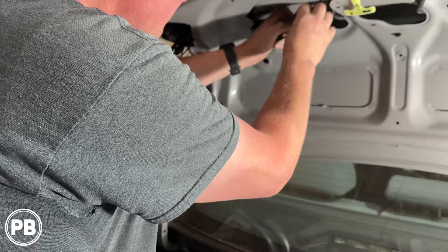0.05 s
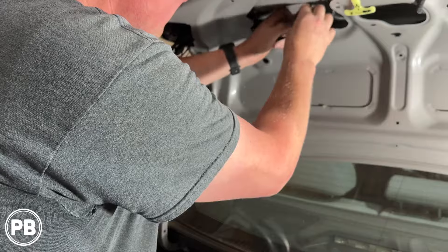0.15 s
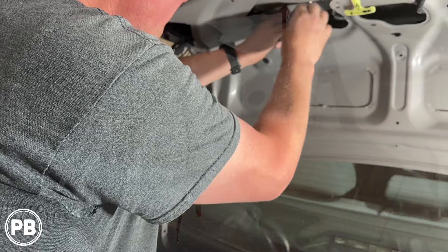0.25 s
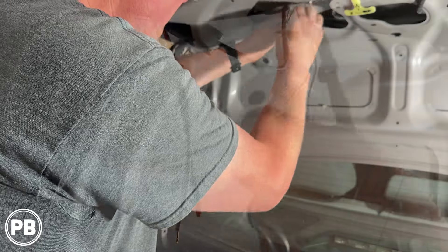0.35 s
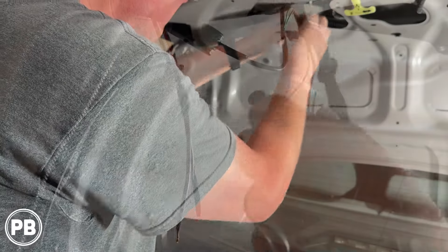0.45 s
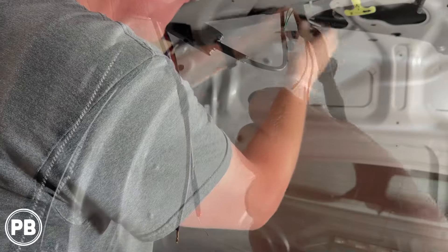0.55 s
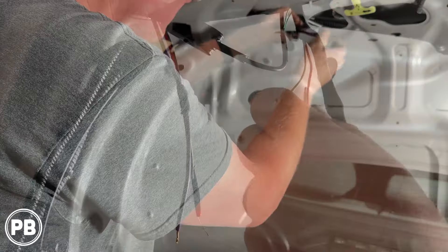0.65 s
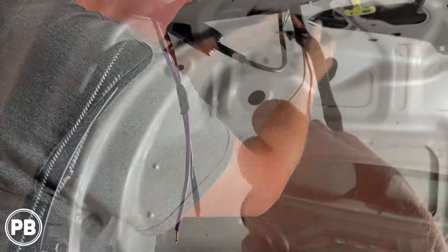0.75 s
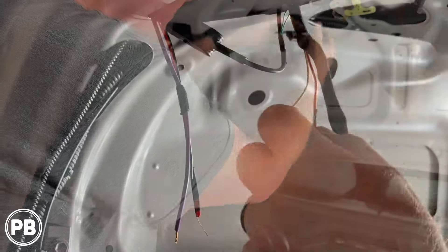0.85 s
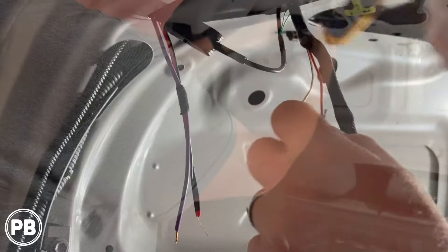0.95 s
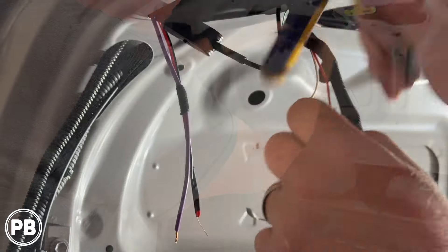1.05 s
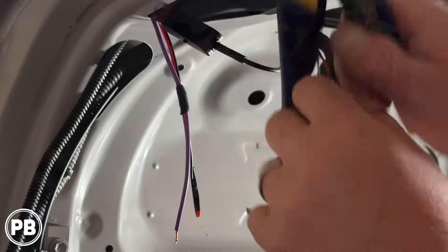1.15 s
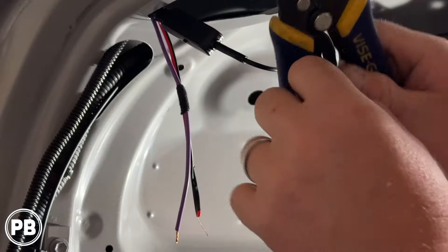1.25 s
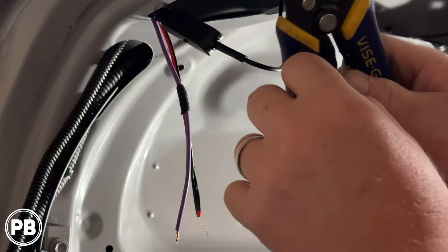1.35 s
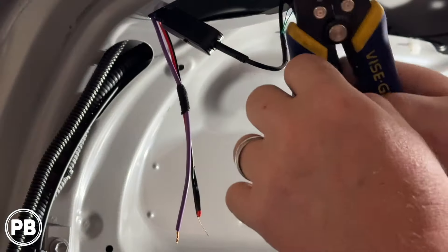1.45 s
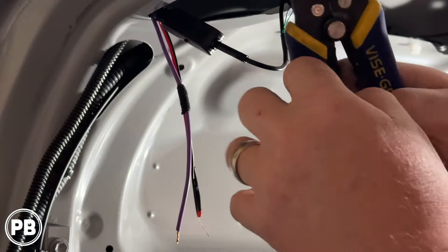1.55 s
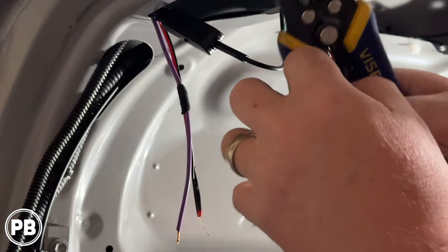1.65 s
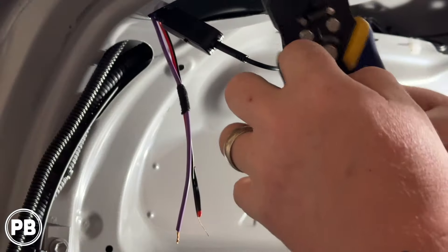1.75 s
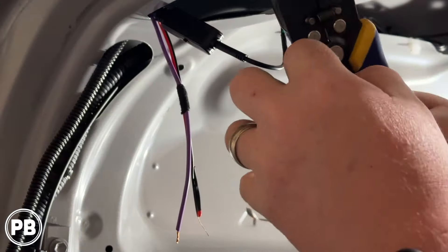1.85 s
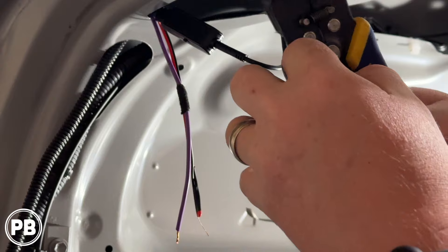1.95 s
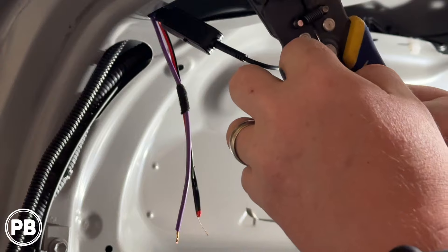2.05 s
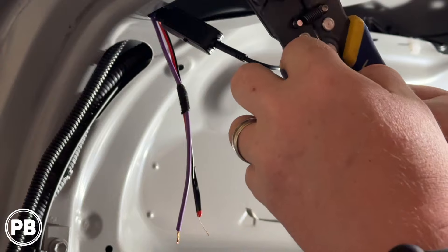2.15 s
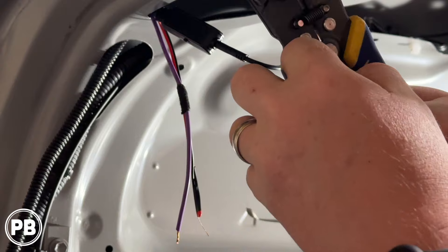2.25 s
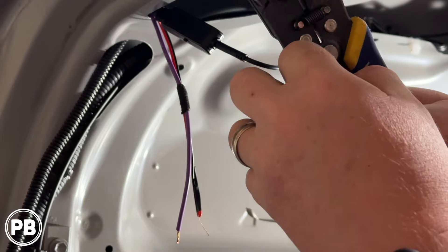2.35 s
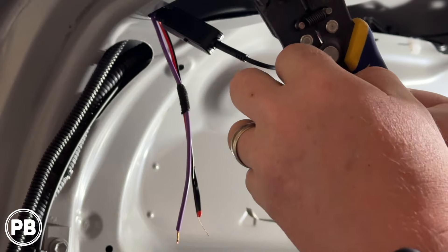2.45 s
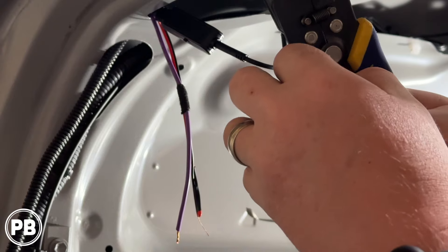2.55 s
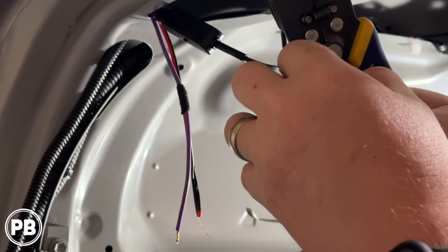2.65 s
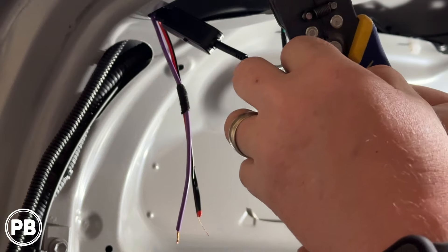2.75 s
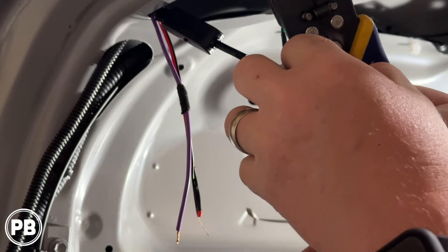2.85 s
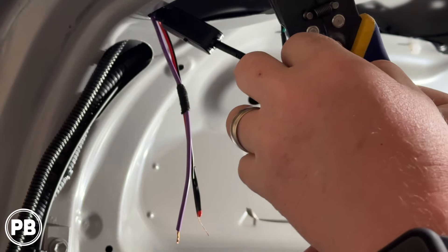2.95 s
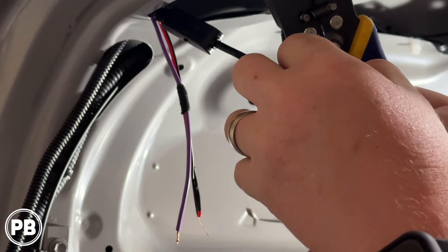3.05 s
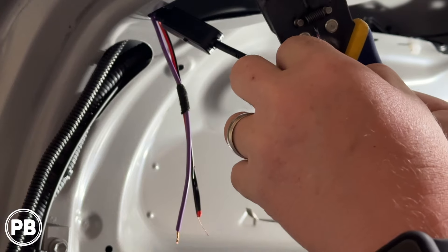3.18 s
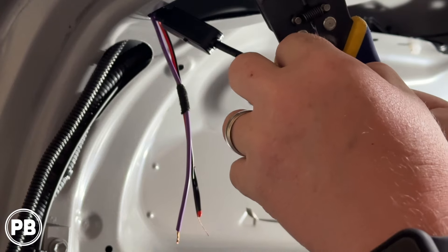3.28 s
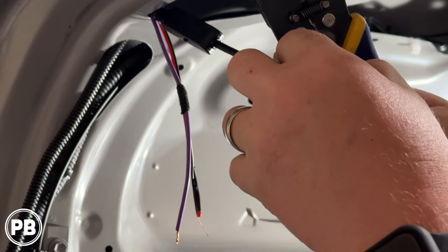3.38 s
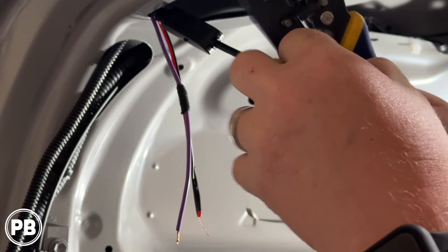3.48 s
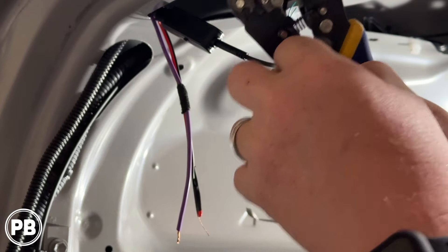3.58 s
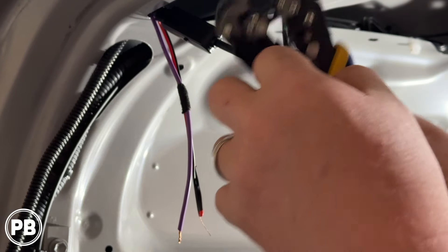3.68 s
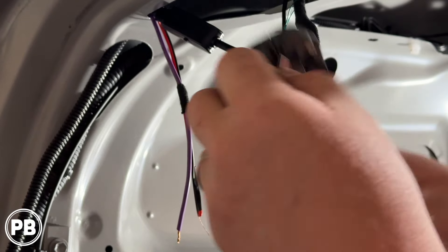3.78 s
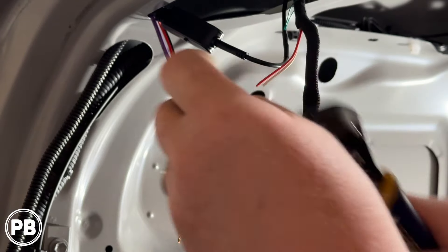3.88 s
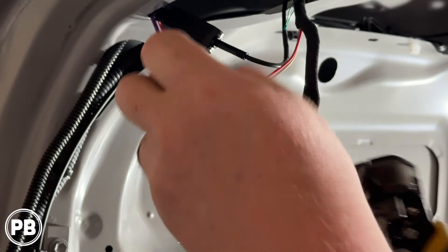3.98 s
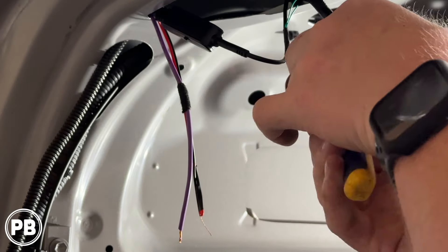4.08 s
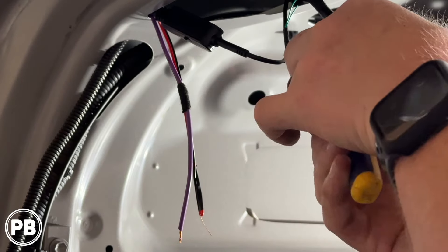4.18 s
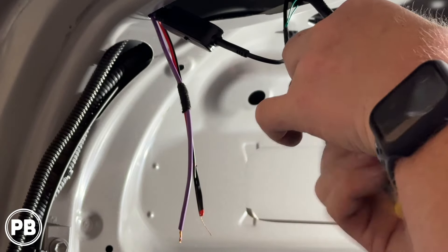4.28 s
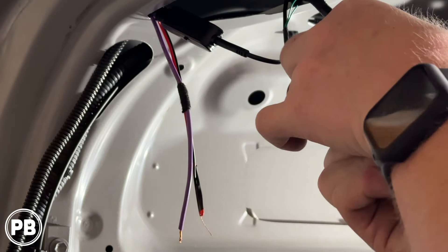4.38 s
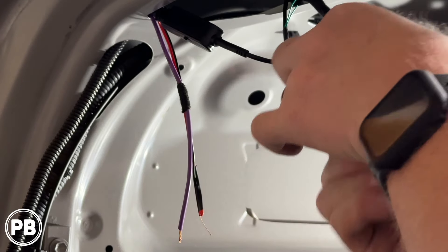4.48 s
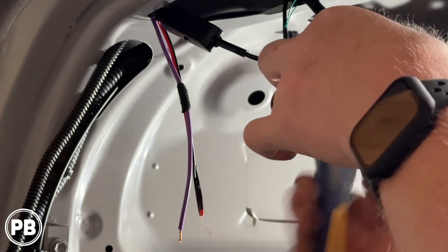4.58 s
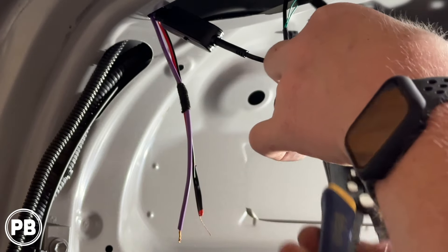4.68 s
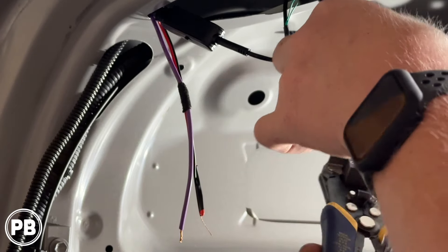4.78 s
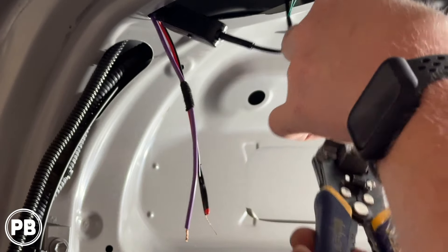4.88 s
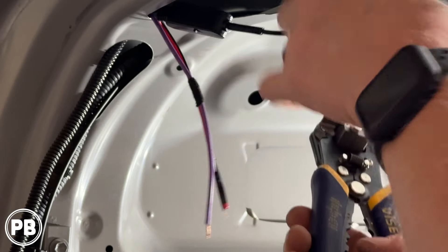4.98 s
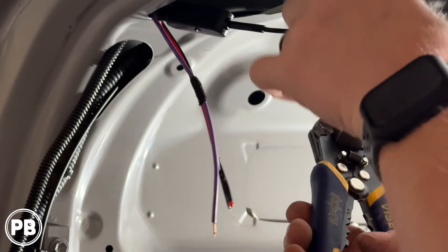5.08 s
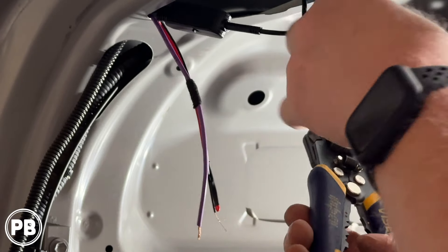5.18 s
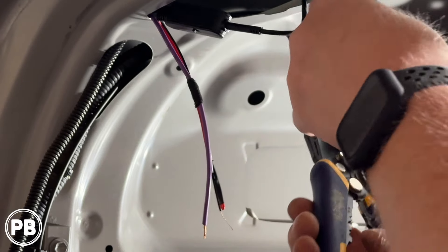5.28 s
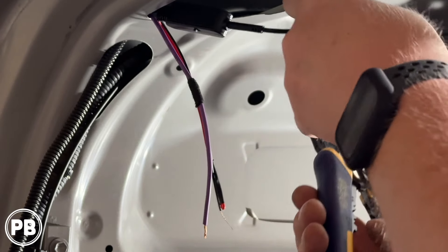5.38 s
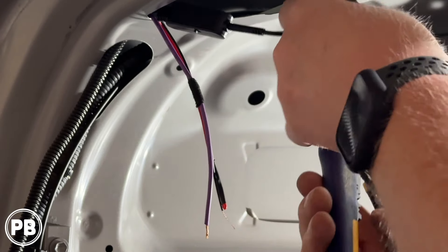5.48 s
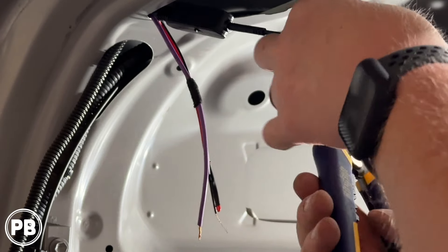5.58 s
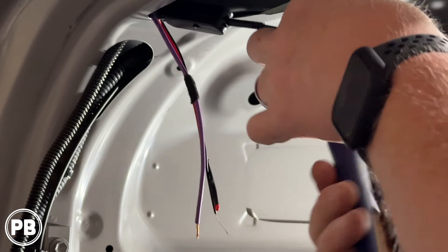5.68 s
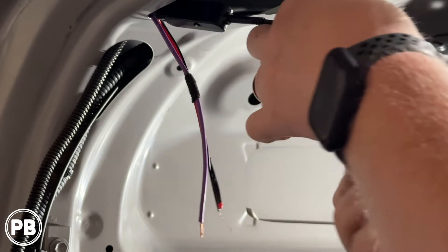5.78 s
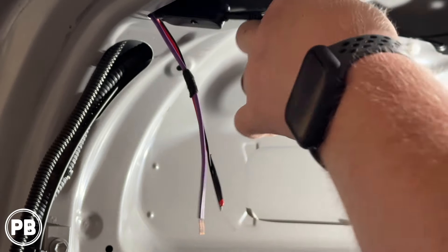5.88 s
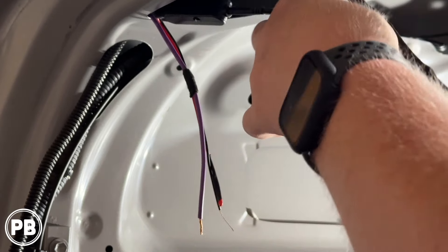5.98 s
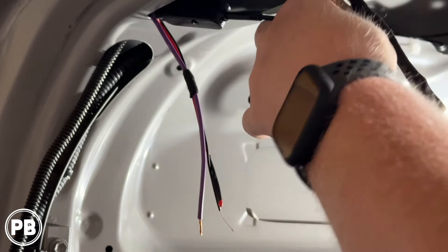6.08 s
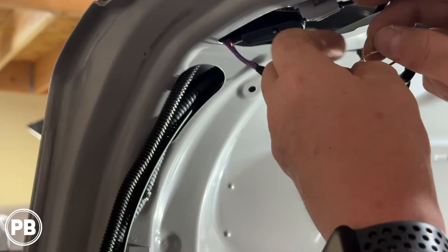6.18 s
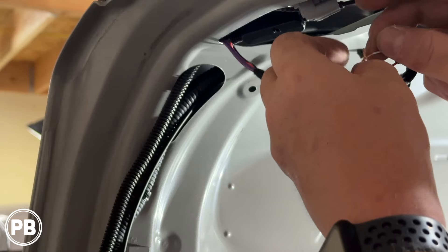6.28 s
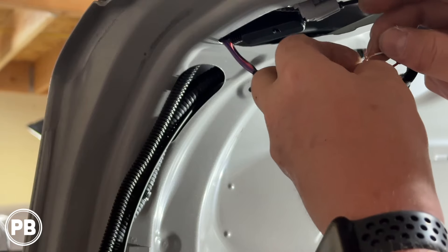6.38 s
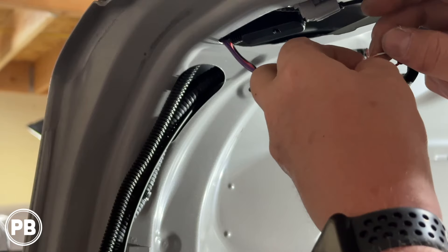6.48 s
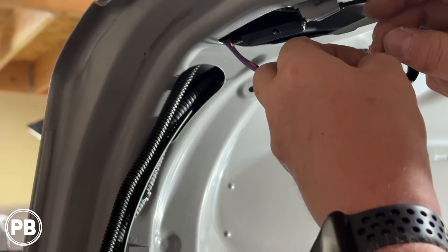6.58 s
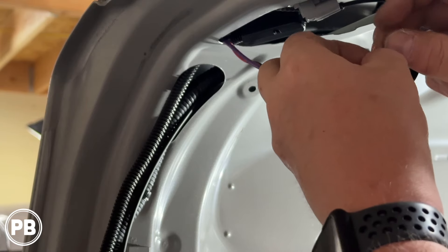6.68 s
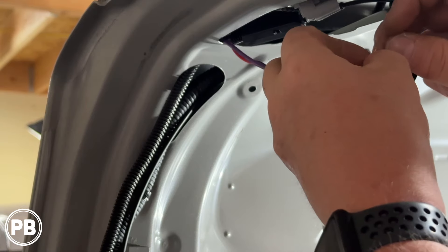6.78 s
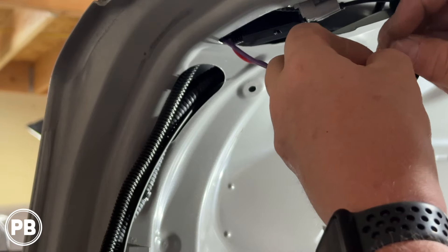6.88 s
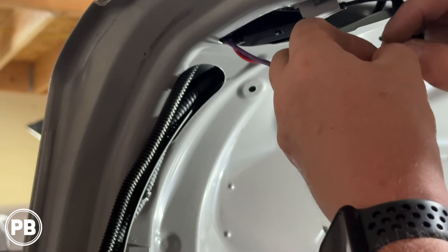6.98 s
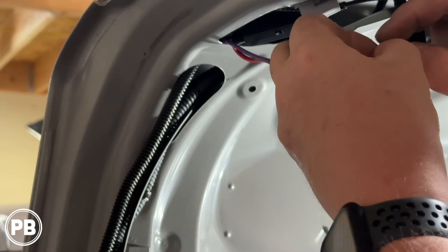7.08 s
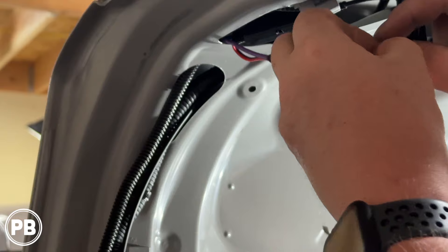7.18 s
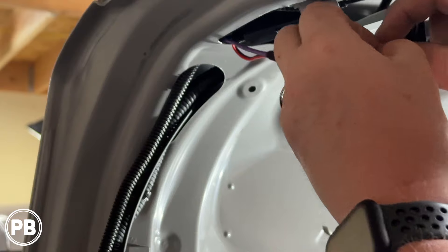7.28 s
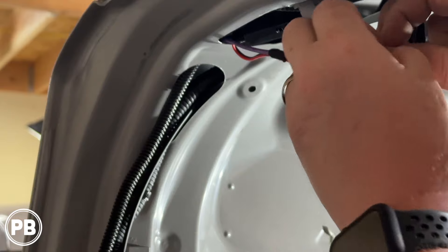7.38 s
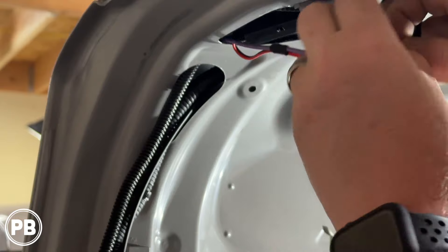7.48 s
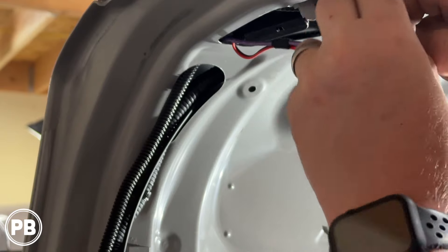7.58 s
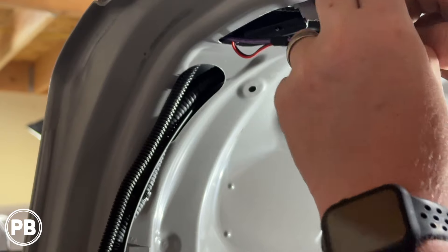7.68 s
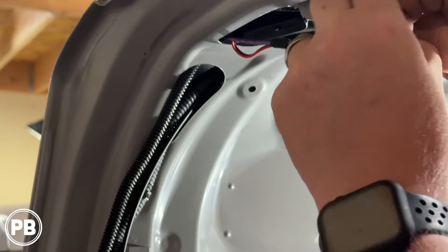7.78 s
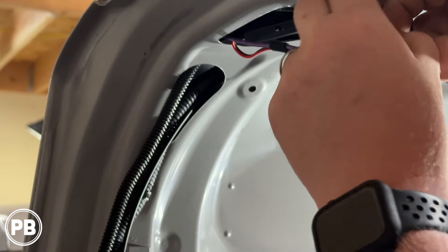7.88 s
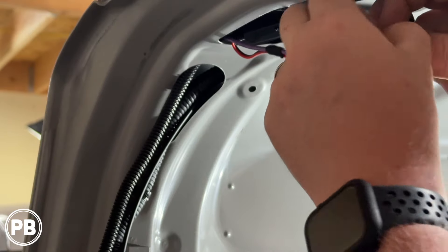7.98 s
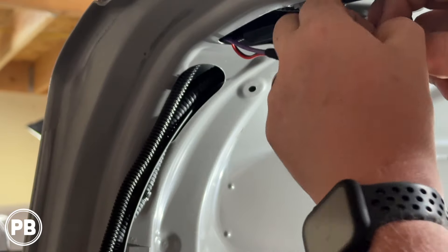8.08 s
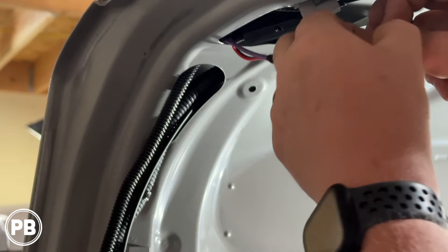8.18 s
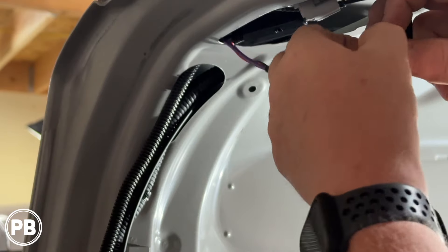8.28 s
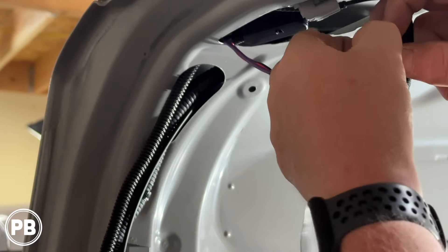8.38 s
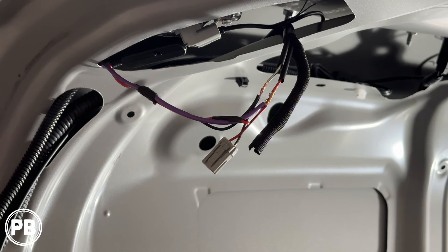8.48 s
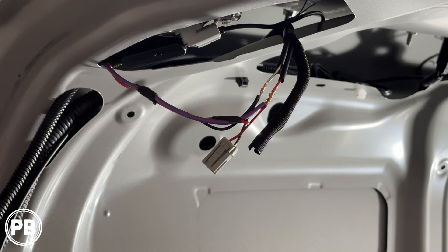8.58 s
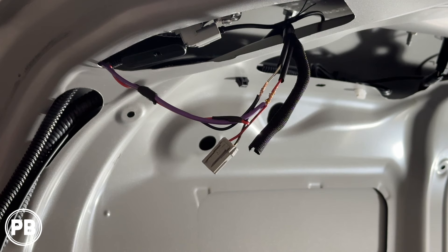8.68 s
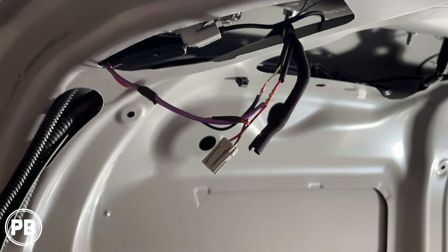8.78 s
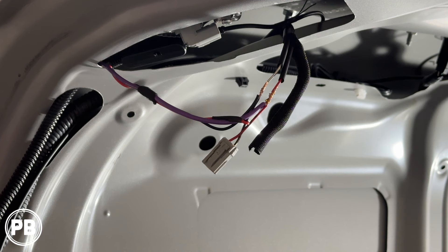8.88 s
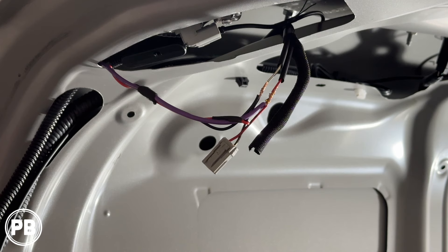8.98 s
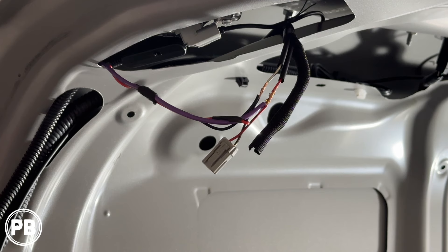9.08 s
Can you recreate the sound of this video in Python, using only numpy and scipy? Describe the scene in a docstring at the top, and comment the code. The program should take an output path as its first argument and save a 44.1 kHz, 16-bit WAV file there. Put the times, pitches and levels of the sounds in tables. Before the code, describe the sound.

Close stereo pickup inside a car's open tailgate in a garage. A fast bright rustle with a tiny plastic squeak and hollow knock comes first, then dull tool bites on wire. After a quieter gap, a cluster of crisp steel clicks and snaps builds to one loud clack, followed by more snaps and a panel bump. Soft cable rubs and small ticks finish, over low rumble, thin hiss and faint hum.

```python
"""Steel jaws bite and snap on thin wire in a car's open tailgate; metal knocks, cable slides and ticks.
Strikes are noise cracks plus ringing modes; slides are rough filtered noise; squeaks are gliding overtones.
Behind them a garage rumbles, hisses and hums: filtered noise, an unsteady motor note, faint narrow tones.
Noise-built reflections add the room; two close microphone ports give the stereo difference."""
import sys
import numpy as np
from scipy import signal
from scipy.fft import rfft, irfft, next_fast_len
from scipy.io import wavfile
from scipy.ndimage import uniform_filter1d

SR = 44100
rng = np.random.default_rng(int(sys.argv[2]) if len(sys.argv) > 2 else 0)


def pcm_store(signal):
    """Save signal as 16-bit PCM."""
    levels = np.round(np.clip(np.atleast_2d(signal), -1, 1) * 32767)
    wavfile.write(sys.argv[1], SR, levels.astype(np.int16).T)


N = 403074
TIME = np.arange(N) / SR

# Garage background colour. Each row: frequency in Hz, gain in dB.
AIR_COLOUR = [(22, -27.5), (38, -2), (55, 3.5), (75, -1), (115, -2.5), (150, -11), (300, -13), (640, -20),
              (950, -26.5), (1300, -27.5), (2500, -36), (4300, -46.5), (6000, -38.5), (7800, -52),
              (11000, -60.5), (16000, -68.5)]
# Rumble swell ahead of RUMBLE_GAIN_DB. Each row: time in seconds, level in dB.
RUMBLE_SWELL = [(0.6, -56.5), (4.81, -55), (6.4, -63.5), (7.05, -60), (9.14, -61)]
# Background hiss. Each row: time in seconds, level in dB.
HISS_SWELL = [(0, -53), (1.1, -51.5), (3.2, -57), (4.1, -57), (4.7, -45.5), (5.35, -55), (8.3, -56),
              (9.14, -47)]
RUMBLE_GAIN_DB, AIR_DB, AIR_FOLLOW = 3, -53.5, 0.45  # air follows this share of the rumble's swell in dB
# Motor hum. Each row: time in seconds, fundamental level in dB, octave level in dB.
HUM_LEVELS = [(.2, -60, -59), (.7, -61, -70), (4, -57, -65.5), (5.5, -72.5, -69), (7, -60.5, -69.5),
              (7.8, -60.5, -76.5)]
HUM_HZ = 94.6
# Faint garage tones. Each row: frequency in Hz, level in dB.
GARAGE_TONES = [(460, -78), (528, -73.5), (645, -74), (820, -79), (1066, -84.5)]

# Sleeve whipping off the harness. One row: start in seconds, length in seconds, level in dB.
SLEEVE_PULL = (.210, 0.096, -40)
# Its colour. Each row: frequency in Hz, gain in dB.
SLEEVE_COLOUR = [(300, -16), (1500, -8), (4000, -0.5), (6500, -6), (9000, 2.5), (11500, -3), (14000, 8.5),
                 (16000, -8.5)]
# Insulation squeaking as the sleeve slips. Each row: time in seconds, pitch in Hz, level in dB.
SQUEAK_GLIDE = [(.214, 670, -67), (0.229, 766, -54), (0.239, 826, -51), (0.249, 1030, -57),
                (0.258, 978, -56), (0.271, 813, -58)]
SQUEAK_ROLLOFF_DB_PER_OCTAVE = -4

# Blows reaching the panel. Each row: start in seconds, level in dB, t60 in seconds, favoured ring in Hz.
PANEL_KNOCKS = [(.272, -32.5, 0.14, 2080), (.277, -32, 0.26, 633), (.29, -40.5, 0.24, 206),
                (.78, -58.5, .12, 624), (1.197, -48.5, 0.24, 745), (2.63, -50.5, 0.29, 306),
                (3.461, -45.5, 0.25, 760), (3.507, -39, 0.22, 486), (4.266, -47.5, 0.2, 780),
                (4.319, -33, 0.069, 330), (4.3195, -32, 0.034, 1200), (4.920, -32.5, 0.077, 878),
                (4.926, -35, 0.28, 440), (5.053, -45.5, 0.22, 794), (5.095, -39.5, .18, 1393),
                (8.87, -52, 0.16, 185.3)]
# Sheet metal modes. Each row: frequency in Hz, level in dB, t60 in seconds.
PANEL_RINGS = [(223, -9.5, 0.069), (353, -2.5, .2), (484.4, -1.5, 0.1), (628, -2.5, 0.076),
               (840, -6.5, 0.26), (1096, -4.5, 0.049), (1324, -3, .11), (2040, -4.5, 0.17)]
# Sheet metal contact colour. Each row: frequency in Hz, gain in dB.
PANEL_COLOUR = [(60, -13.5), (170, -2.5), (400, 2.5), (800, 0), (1400, -4), (2300, -10.5), (3000, -15.5),
                (7000, -31), (16000, -47.5)]
# Each bite also tugs the panel, at TUG_DB relative to the bite.
TUG_DB, TUG_T60_S, TUG_TILT_DB_PER_OCTAVE, TUG_HZ = -11, .5, -7, 129

# Wire ends and sleeves tapping. Each row: start in seconds, level in dB, favoured ring in Hz.
WIRE_TAPS = [(.272, -33.5, 4800), (.567, -62, 6530), (0.665, -59.5, 6640), (.849, -55.5, 6900),
             (1.087, -54, 4540), (1.722, -52.5, 4000), (1.758, -59, 5000), (2.460, -51.5, 6000),
             (4.019, -56.5, 6000), (4.152, -62, 4030), (4.932, -52.5, 6960), (5.763, -53, 2360),
             (5.859, -63.5, 2290), (5.891, -52.5, 1403), (5.933, -56.5, 2300), (6.028, -52.5, 3790),
             (6.311, -64.5, 1900), (6.416, -48, 1644), (6.515, -57.5, 1405), (7.271, -50.5, 1303),
             (7.938, -52, 1270), (8.511, -65.5, 3000)]
# Wire and sleeve modes. Each row: frequency in Hz, level in dB, t60 in seconds.
WIRE_RINGS = [(1290, -3, 0.07), (2300, -5.5, .04), (4024, -2.5, 0.094)]
TAP_MID_HZ, TAP_T60_S, TAP_SHORTENING = 2640, 0.077, 0.63  # t60 at mid pitch, its halvings per octave above
# Random taps while the cable slides: most likely near the base level, a few stronger.
STRAY_TAPS_PER_S, STRAY_BASE_DB, STRAY_SPREAD_DB = 18, -8, 5.5
STRAY_LOW_HZ, STRAY_HIGH_HZ = 1160, 3670

# Jaws seating on wire, damped by the grips. Each row: start in seconds, level in dB.
JAW_BITES = [(1.198, -45), (1.371, -32.5), (1.545, -38)]
BITE_T60_S, BITE_TILT_DB_PER_OCTAVE, BITE_HZ = 0.1, 0.5, 2310
# Grip modes. Each row: frequency in Hz, level in dB, t60 in seconds.
GRIP_RINGS = [(1090, 4, 0.16), (1930, 7.5, 0.12), (2440, -5, .08), (4000, -23, .07), (6140, 17.5, 0.02),
              (6470, -10, 0.055)]
# Grip contact colour. Each row: frequency in Hz, gain in dB.
GRIP_COLOUR = [(100, -8), (550, -16), (1100, 3.5), (1500, -4.5), (2300, 3.5), (3000, -10), (4000, 0),
               (5100, -13), (6600, -9.5), (9500, -16.5), (12000, -26), (14000, -15), (16000, -25)]
# Steel jaws and spring. Each row: start in seconds, level in dB, t60 in seconds, favoured ring in Hz.
JAW_CLICKS = [(2.4789, -33.5, 0.013, 6900), (2.5165, -44, 0.0065, 2360), (2.5208, -34, 0.021, 4300),
              (3.429, -25.5, 0.0063, 6300), (3.452, -36.5, 0.041, 4100), (3.46, -26.5, .022, 4100),
              (3.5056, -27.5, 0.034, 2350), (3.509, -27, 0.013, 6700), (3.5345, -34, 0.011, 6700),
              (3.6602, -25.5, 0.014, 6600), (3.6885, -27, 0.024, 6400), (3.6928, -22, .016, 6600),
              (3.7004, -17.5, .019, 7200), (3.7432, -18, .04, 4300), (4.21, -43, .042, 5000),
              (4.264, -35.5, 0.038, 6500), (4.319, -12.5, .019, 4400), (4.5147, -29, 0.025, 4300),
              (4.5246, -24.5, 0.03, 5000), (4.5743, -19, 0.026, 3600)]
# Steel modes. Each row: frequency in Hz, level in dB, t60 in seconds.
STEEL_RINGS = [(2400, 2, 0.027), (3540, -4.5, 0.033), (4100, 3.5, .03), (4700, -7, 0.014),
               (5818, -26.5, .8), (5780, -19.5, .45), (6052, -18, 0.15), (6600, 1, 0.093),
               (7150, -1.5, 0.05), (9880, -6.5, .035)]
# Steel contact colour. Each row: frequency in Hz, gain in dB.
STEEL_COLOUR = [(100, -31), (700, -26), (1400, -14.5), (2400, -4), (4300, -5), (7000, 3), (9500, -3.5),
                (11000, -9.5), (13000, -3), (16000, -9)]

# Cable sliding through the fingers. Each row: start in seconds, length in seconds, level in dB.
CABLE_RUBS = [(1.697, 0.11, -59), (1.882, 0.26, -68), (5.242, 0.11, -58), (5.398, 0.12, -56.5),
              (5.861, 0.26, -64.5), (6.728, 0.22, -62), (7.279, 0.13, -59.5), (7.389, .099, -55.5),
              (7.708, 0.13, -65.5), (7.891, .1, -60.5), (8.449, .093, -70)]
# Cable contact colour. Each row: frequency in Hz, gain in dB.
CABLE_COLOUR = [(100, -13), (400, -2), (750, 5.5), (1100, -2), (1400, 6.5), (1800, -6.5), (2300, -3),
                (4000, -9.5), (7000, -15), (10500, -29), (14000, -30.5), (16000, -32)]
RUB_TILT_DB_PER_OCTAVE = -3.2
# Jaws creeping along the wire. Each row: start in seconds, length in seconds, midway level in dB.
JAW_SCRAPES = [(3.651, .012, -40), (3.675, .024, -40.5), (4.245, .022, -48.5), (4.472, 0.049, -42)]
# Whistling twisted strands. One row: start in seconds, length in seconds, pitch in Hz, peak level in dB.
STRAND_TWIST = (6.745, .17, 4050, -77)

# Late reverberation. Each row: frequency in Hz, t60 in seconds.
ROOM_T60_S = [(150, 0.28), (600, 0.21), (2000, .5), (5000, 0.5), (9000, 0.4143), (16000, 0.45)]
# Wall colour. Each row: frequency in Hz, gain in dB.
WALL_COLOUR = [(200, 6.5), (2000, -2.5), (7000, -2), (9500, 0), (12000, -7.5), (16000, -7)]
# What the two ports share. Each row: frequency in Hz, gain in dB.
PORT_SHARED = [(30, -1), (7200, 0), (7800, -5.5), (8350, -19), (9000, 3.5), (9600, 1), (16000, -8.5)]
# How they differ in phase-shifted frontal sound. Each row: frequency in Hz, gain in dB.
PORT_DIFFERENCE = [(60, -28.5), (400, -17.5), (1100, -11), (1900, -25.5), (2700, -18), (4200, -10),
                   (5800, -27.5), (7000, -10.5), (8100, 10.5), (10000, -4.5), (11700, -18), (14000, -8.5),
                   (15500, -6.5)]
# How they differ in room sound and background. Each row: frequency in Hz, gain in dB.
PORT_ROOM = [(30, -31.5), (100, -16), (200, -12), (600, -5.5), (1200, -4.5), (2000, -30), (16000, -16.5)]
TOP_HZ = 16200


def undb(db):
    """Decibels to gain."""
    return 10 ** (np.asarray(db) / 20)


def unit(x):
    """Scale to rms 1."""
    return x / np.sqrt(np.mean(x ** 2))


def along(points, hz):
    """Read (Hz, value) points on a log-frequency axis."""
    point_hz, value = np.transpose(points)
    return np.interp(np.log(np.maximum(hz, 1)), np.log(point_hz), value)


def shape(x, points):
    """Zero-phase filter by a (Hz, dB) curve."""
    hz = np.fft.rfftfreq(len(x), 1 / SR)
    return irfft(rfft(x) * undb(along(points, hz)), len(x))


def causal(x, gain):
    """Minimum-phase filter with the given gain per frequency bin."""
    cepstrum = irfft(np.log(gain), len(x))
    cepstrum[1:len(x) // 2] *= 2
    cepstrum[len(x) // 2 + 1:] = 0
    return irfft(rfft(x) * np.exp(rfft(cepstrum)), len(x))


def colour(x, points, tilt_db):
    """Filter of unit power gain: a (Hz, dB) curve tilted per octave."""
    hz = np.fft.rfftfreq(len(x), 1 / SR)
    gain_db = along(points, hz) + tilt_db * np.log2(np.maximum(hz, 20))
    return causal(x, unit(undb(gain_db)))


def even(x, order=24):
    """Level the broad ripples in a burst's spectrum, keeping its energy."""
    bins = len(x) // (4 * order)
    power = uniform_filter1d(uniform_filter1d(np.abs(rfft(x)) ** 2, bins), bins)
    return causal(x, np.sqrt(power.mean() / power))


def fade(t, t60):
    """Exponential decay, 60 dB down after t60."""
    return np.exp(-np.log(1000) * t / max(t60, 1 / SR))


def walk(rate_hz):
    """Smooth random wandering with spread 1."""
    hold = int(SR / rate_hz)
    steps = np.repeat(rng.standard_normal(N // hold + 1), hold)
    return unit(uniform_filter1d(uniform_filter1d(steps, hold), hold))[:N]


def add(track, s, x):
    """Mix a sound in at a time."""
    start = max(int(s * SR), 0)
    track[start:start + len(x)] += x[:max(N - start, 0)]


def brightened(rows, mid_hz, tilt_db, brighten_db):
    """The stiffer the spot hit, the higher it rings and the brighter the blow: adds tilt in dB per octave."""
    return [(s, db, t60, tilt_db + brighten_db * np.log2(hz / mid_hz), hz) for s, db, t60, hz in rows]


def ringing(modes, t):
    """Decaying sines; the grip changes each mode's share and detunes it a little."""
    ring = np.zeros(len(t))
    for mode_hz, mode_db, t60 in modes:
        share, detune = rng.standard_normal(2)
        sine = np.sin(2 * np.pi * mode_hz * (1 + 0.01 * detune) * t)
        # random polarity
        ring += undb(mode_db + 2 * share) * np.sign(detune) * fade(t, t60) * sine
    return ring


def strikes(events, spectrum, modes, ring_db, snap_db, snap_s, spot_db, spot_width=0.13, rise_s=.0002,
            size=16384):
    """Each blow is a hard snap and a dense, fast-dying crack, with the body's modes ringing on."""
    track, t = np.zeros(N), TIME[:size]
    hz = np.fft.rfftfreq(size, 1 / SR) + 1
    for s, db, t60, tilt_db, spot_hz in events:
        envelope = (fade(t, t60) + undb(snap_db) * fade(t, snap_s)) * (1 - np.exp(-t / rise_s))
        # the point of contact favours one resonance; spot_width in octaves
        spot = spot_db / (1 + (np.log2(hz / spot_hz) / spot_width) ** 2)
        burst = even(rng.choice([-1, 1], size) * envelope)
        crack = colour(burst, np.c_[hz, along(spectrum, hz) + spot], tilt_db)
        add(track, s, undb(db) * (crack + undb(ring_db) * ringing(modes, t)))
    return track


def background(rumble_hz=110, hiss_hz=1500):
    """Noise split into rumble, moving air and thin hiss, each wavering a little."""
    swell_db = np.interp(TIME, *np.transpose(RUMBLE_SWELL))
    rumble_db = swell_db + RUMBLE_GAIN_DB
    air_db = AIR_DB + AIR_FOLLOW * (swell_db - swell_db.mean())
    hiss_db = np.interp(TIME, *np.transpose(HISS_SWELL))
    noise = unit(shape(rng.standard_normal(N), AIR_COLOUR))
    rumble = signal.sosfiltfilt(signal.butter(2, rumble_hz, fs=SR, output="sos"), noise)
    low = signal.sosfiltfilt(signal.butter(2, hiss_hz, fs=SR, output="sos"), noise)
    bands = [(rumble, rumble_db), (low - rumble, air_db), (noise - low, hiss_db)]
    return sum(band * undb(db + .7 * walk(17)) for band, db in bands)


def hum():
    """A distant motor drones unsteadily on a low note and its octave."""
    s, *levels = np.transpose(HUM_LEVELS)
    phase = 2 * np.pi * np.cumsum(HUM_HZ * (1 + .014 * walk(12))) / SR
    track = np.zeros(N)
    for harmonic, db in enumerate(levels, start=1):
        gain = undb(np.interp(TIME, s, db) + 2.2 * walk(16))
        track += np.sqrt(2) * np.sin(harmonic * phase) * gain
    return track


def tones(flutter_hz=35):
    """Narrow resonances of the garage sing faintly in the moving air: sines under random modulation."""
    track = np.zeros(N)
    for hz, db in GARAGE_TONES:
        flutter = walk(flutter_hz) + 1j * walk(flutter_hz)
        track += undb(db) * np.real(flutter * np.exp(2j * np.pi * hz * TIME))
    return track


def sleeve(rise_s=0.016, first_tilt_db=4, last_tilt_db=-3, size=8192):
    """One fast pull gives a thin, bright hiss that starts quickly, then eases off and darkens as it slows."""
    s, length, db = SLEEVE_PULL
    t = TIME[:size]
    slowing = np.minimum(t / length, 1)
    slips = rng.standard_normal(size) * np.minimum(t / rise_s, 1) * np.sqrt(1 - slowing)
    bright = colour(slips, SLEEVE_COLOUR, first_tilt_db)
    dark = colour(slips, SLEEVE_COLOUR, last_tilt_db)
    track = np.zeros(N)
    add(track, s, undb(db) * ((1 - slowing) * bright + slowing * dark))
    return track


def squeaks(waver=.016, count=7):
    """Plastic sticks and slips fast enough to give a rough, gliding note; only its overtones radiate."""
    s, hz, db = np.transpose(SQUEAK_GLIDE)
    t = np.arange(s[0], s[-1], 1 / SR)
    roughness = unit(uniform_filter1d(rng.standard_normal(N), size=30))[:len(t)]
    phase = 2 * np.pi * np.cumsum(np.interp(t, s, hz) * (1 + waver * roughness)) / SR
    note = np.zeros(len(t))
    for k in range(2, count + 1):
        note += undb(SQUEAK_ROLLOFF_DB_PER_OCTAVE * np.log2(k / 2)) * np.sin(k * phase)
    track = np.zeros(N)
    add(track, s[0], np.sqrt(2) * undb(np.interp(t, s, db)) * note)
    return track


def panel():
    """The tailgate's sheet metal answers tugs and bumps with a hollow knock."""
    tugs = [(s, db + TUG_DB, TUG_T60_S, TUG_TILT_DB_PER_OCTAVE, TUG_HZ) for s, db in JAW_BITES]
    bumps = brightened(PANEL_KNOCKS, mid_hz=497, tilt_db=-2.95, brighten_db=3.5)
    return strikes(bumps + tugs, PANEL_COLOUR, PANEL_RINGS, ring_db=-11.5, snap_db=-17.5, snap_s=0.0062,
                   spot_db=11.5, spot_width=0.15)


def stray_taps():
    """Loose wire ends flick about at random during each pull, at levels set relative to the pull."""
    rows = []
    for s, length, db in CABLE_RUBS:
        for when, strength, where in rng.random((int(STRAY_TAPS_PER_S * length), 3)):
            tap_db = db + STRAY_BASE_DB - STRAY_SPREAD_DB * np.log(1 - strength)
            tap_hz = STRAY_LOW_HZ * (STRAY_HIGH_HZ / STRAY_LOW_HZ) ** where
            rows.append((s + when * length, tap_db, tap_hz))
    return rows


def wires():
    """Wire ends and plastic sleeves tap against tool and trim; higher taps die sooner."""
    taps = [(s, db, TAP_T60_S * (TAP_MID_HZ / hz) ** TAP_SHORTENING, hz)
            for s, db, hz in WIRE_TAPS + stray_taps()]
    taps = brightened(taps, mid_hz=TAP_MID_HZ, tilt_db=3.0, brighten_db=4.5)
    return strikes(taps, CABLE_COLOUR, WIRE_RINGS, ring_db=-20.0, snap_db=-8.0, snap_s=.007, spot_db=4.5,
                   size=8192)


def strippers():
    """Steel jaws seat on the wire, close, slip along the insulation and spring open."""
    bites = [(s, db, BITE_T60_S, BITE_TILT_DB_PER_OCTAVE, BITE_HZ) for s, db in JAW_BITES]
    seating = strikes(bites, GRIP_COLOUR, GRIP_RINGS, ring_db=-15.5, snap_db=-5, snap_s=0.01, spot_db=3.5)
    clicks = brightened(JAW_CLICKS, mid_hz=5470, tilt_db=-0.4, brighten_db=3.5)
    return seating + strikes(clicks, STEEL_COLOUR, STEEL_RINGS, ring_db=-22, snap_db=-2.5, snap_s=0.011,
                             spot_db=8.0)


def cable(grain_db=2.5, catch_db=-2.5, size=32768):
    """Sliding insulation catches in many tiny slips that swell and ease with each pull."""
    track = np.zeros(N)
    for s, length, db in CABLE_RUBS:
        pull = np.abs(np.sin(np.pi * np.minimum(TIME[:size] / length, 1))) ** 0.33
        grains = np.repeat(rng.standard_normal(size), 32)[:size]
        catches = unit(uniform_filter1d(rng.standard_normal(size), size=300))
        slips = unit(rng.standard_normal(size) * undb(grain_db * grains + catch_db * catches))
        add(track, s, undb(db) * colour(slips * pull, CABLE_COLOUR, RUB_TILT_DB_PER_OCTAVE))
    return track


def scrapes(grow_db=15.0, grain_db=4, tilt_db=-2, size=8192):
    """The jaws creep over the wire in small slips that grow with the squeeze."""
    track = np.zeros(N)
    for s, length, db in JAW_SCRAPES:
        squeeze = np.minimum(TIME[:size] / length, 1)
        grains = np.repeat(rng.standard_normal(size), 64)[:size]
        slips = unit(rng.standard_normal(size) * undb(grain_db * grains))
        growth = undb(db + grow_db * (squeeze - 0.5)) * (squeeze < 1)
        add(track, s, colour(slips * growth, STEEL_COLOUR, tilt_db))
    return track


def twist(waver=.023, size=16384):
    """Copper strands wound round each other give a thin, rough whistle that swells and fades."""
    s, length, hz, db = STRAND_TWIST
    pitch = hz * (1 + waver * unit(uniform_filter1d(rng.standard_normal(size), size=30)))
    swell = np.sin(np.pi * np.minimum(TIME[:size] / length, 1))
    track = np.zeros(N)
    add(track, s, undb(db) * swell * np.sin(2 * np.pi * np.cumsum(pitch) / SR))
    return track


def garage(x, early_db=-15, early_t60=0.14, late_db=-12.0, build_s=.006, size=32768):
    """Quick reflections from the car body, then the tail of the room, both decaying noise."""
    t = TIME[:size]
    hz, frame_s, frames = signal.stft(rng.standard_normal(size), SR)
    decay = np.exp(-np.log(1000) * frame_s / along(ROOM_T60_S, hz)[:, None])
    late = signal.istft(frames * decay, SR)[1][:size] * (1 - np.exp(-t / build_s))
    early = even(rng.standard_normal(size) * fade(t, early_t60) * (t > .002))
    response = (undb(early_db) * unit(early) + undb(late_db) * unit(late)) / np.sqrt(size)
    return shape(signal.fftconvolve(x, response)[:N], WALL_COLOUR)


def scene():
    """Frontal sound reaches both ports; phase-shifted, room and background sound make them differ."""
    work = sleeve() + squeaks() + panel() + wires() + strippers() + cable() + scrapes() + twist()
    front = work + garage(work) + background() + hum() + tones()
    quadrature = np.imag(signal.hilbert(front, next_fast_len(N)))[:N]
    # fresh noise draws keep this part independent of the front
    diffuse = garage(work) + background()
    side = shape(quadrature, PORT_DIFFERENCE) + shape(diffuse, PORT_ROOM)
    mid = shape(front, PORT_SHARED)
    return np.array([mid - side, mid + side])


def record(dry):
    """The recorder clips peaks at full scale, then a steep low-pass cuts the top."""
    low_pass = signal.ellip(8, .2, 80, TOP_HZ, fs=SR, output="sos")
    return signal.sosfilt(low_pass, np.clip(dry, -1, 1))


dry = scene()
out = record(dry)
pcm_store(out)
```